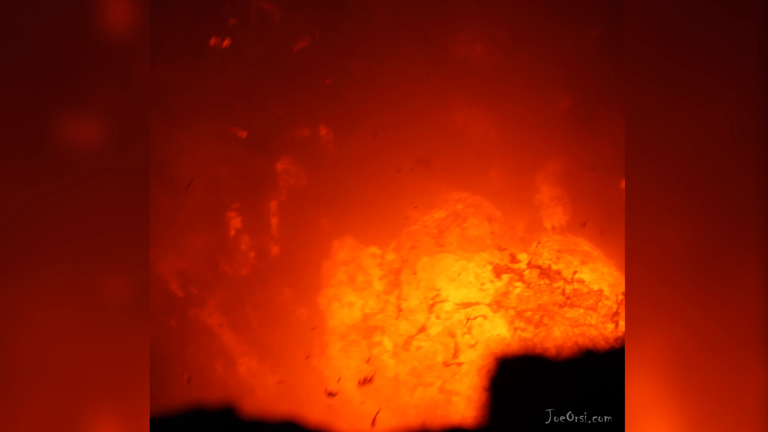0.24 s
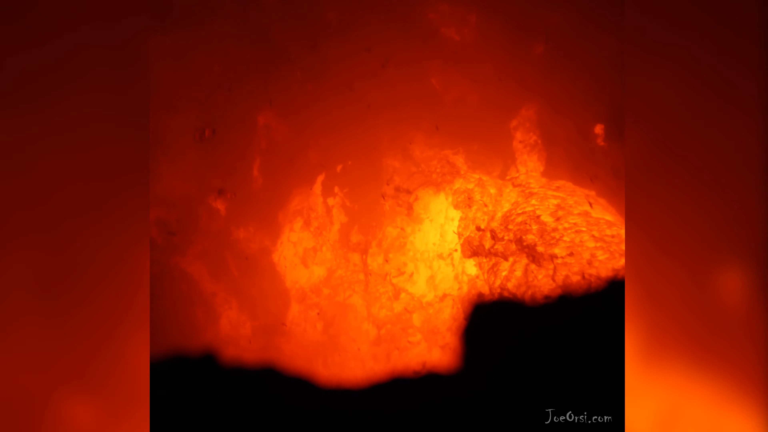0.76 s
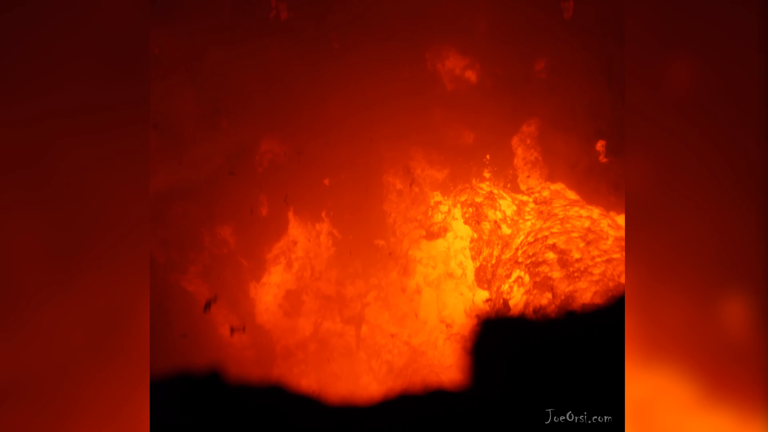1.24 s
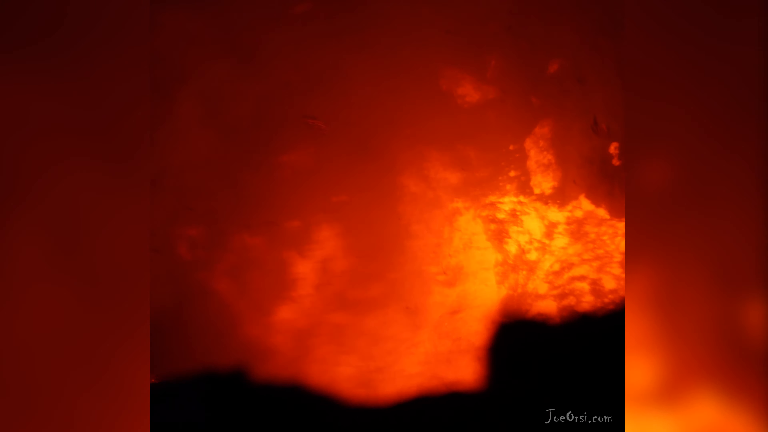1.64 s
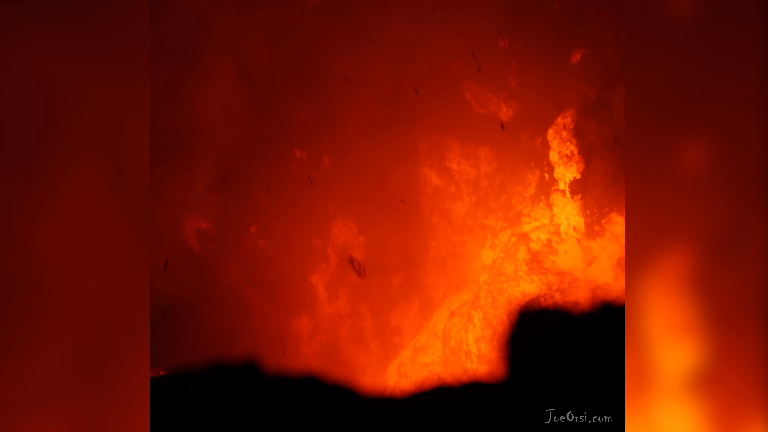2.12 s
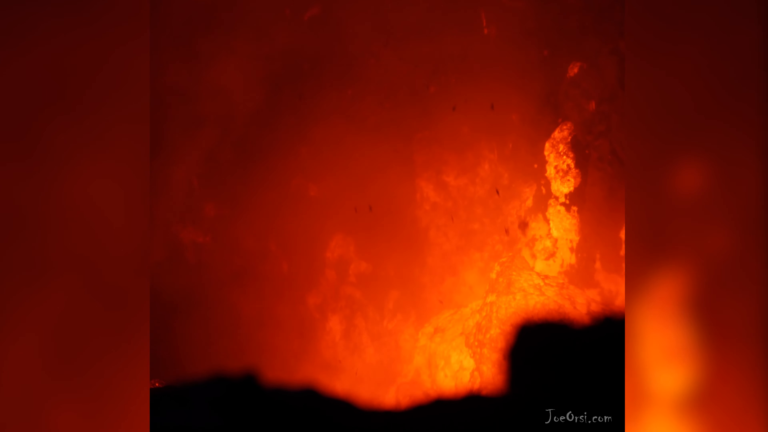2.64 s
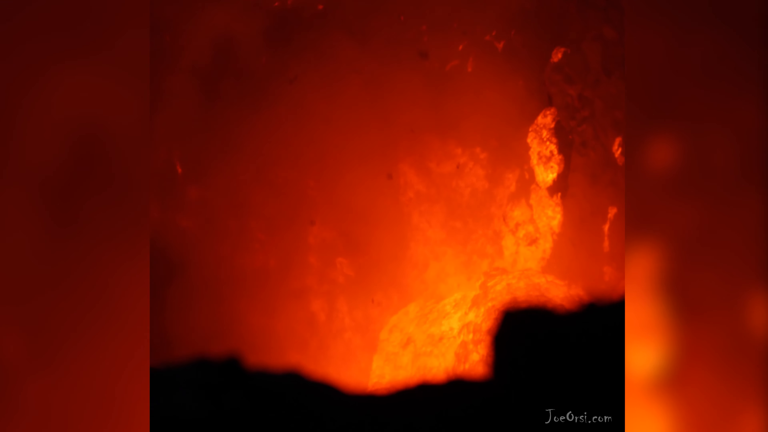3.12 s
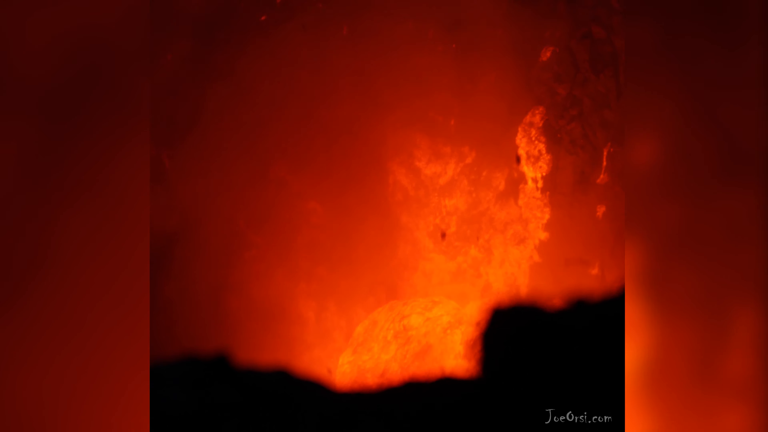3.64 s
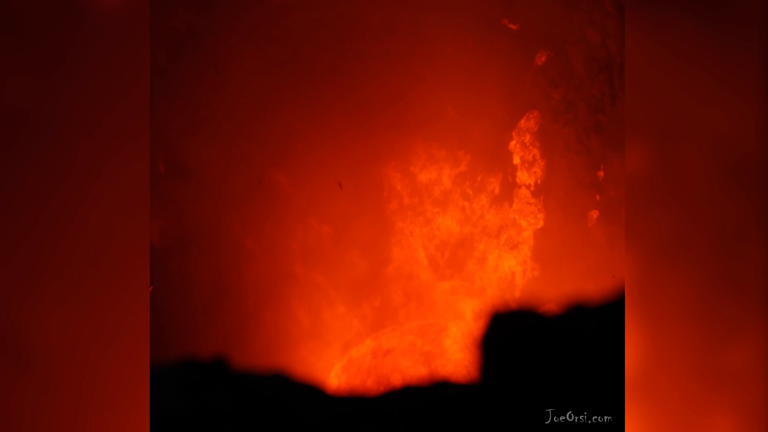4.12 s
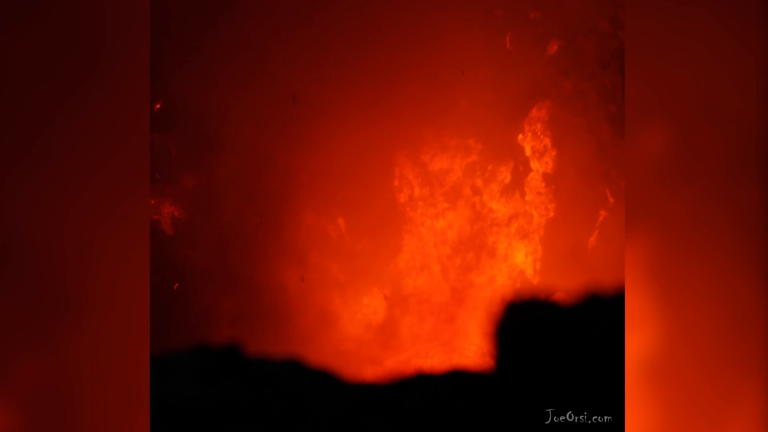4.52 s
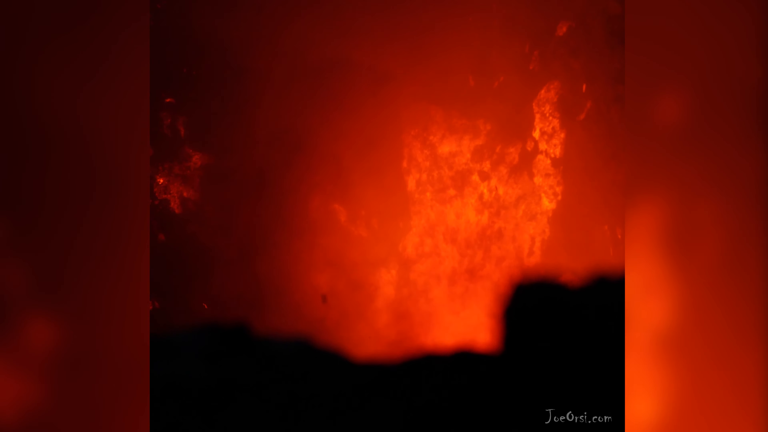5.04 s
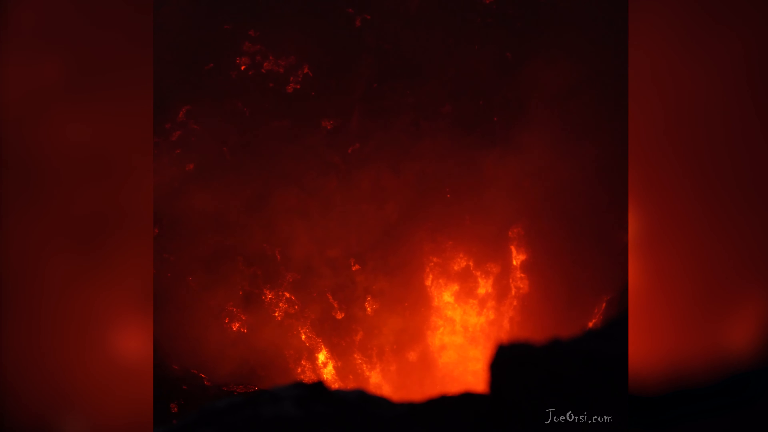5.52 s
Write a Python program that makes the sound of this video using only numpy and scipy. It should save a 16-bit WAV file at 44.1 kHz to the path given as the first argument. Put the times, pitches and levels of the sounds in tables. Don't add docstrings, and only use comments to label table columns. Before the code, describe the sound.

Dark, low volcanic gas roar swells and chokes while big bubbles gulp and boom and thrown lava crunches, clicks and patters on rock.

```python
import sys
import numpy as np
from scipy import signal
from scipy.fft import rfft, irfft, next_fast_len
from scipy.io import wavfile
from scipy.ndimage import uniform_filter1d, minimum_filter1d, map_coordinates

SR = 44100
rng = np.random.default_rng(int(sys.argv[2]) if len(sys.argv) > 2 else 0)


def waveform_to_disk(signal):
    frames = np.transpose(np.atleast_2d(signal))
    scaled = np.clip(frames, -1, 1) * 32767
    samples = np.round(scaled).astype(np.int16)
    wavfile.write(sys.argv[1], SR, samples)


def magnitude_from_level(level_db):
    exponent = np.asarray(level_db, float) / 20
    return 10 ** exponent


N = 254456


def unit(x):
    return x / np.sqrt(np.mean(x ** 2) + 1e-20)


def along(points, hz):
    f, v = np.transpose(points)
    return np.interp(np.log(hz + 1), np.log(f + 1), v)


def wobble(rate):
    knots = rng.standard_normal(int(N * rate / SR) + 4)
    return map_coordinates(knots, [np.arange(N) * rate / SR])


def filtered(x, response):
    m = next_fast_len(x.shape[-1] + 8192)
    spectrum = rfft(x, m) * response(np.fft.rfftfreq(m, 1 / SR))
    return irfft(spectrum, m)[..., :x.shape[-1]]


def add(out, start_s, sound, lean_db):
    part = out[:, max(round(start_s * SR), 0):][:, :sound.shape[-1]]
    part += sound[..., :part.shape[1]] * magnitude_from_level(np.array([[lean_db / 2], [-lean_db / 2]]))


# time_s, flow_db, throatiness_db
JET_FLOW = [(0.0, 6.5, -3.5), (0.681, 9.5, -3.5), (0.708, 1.5, -0.5), (.888, 4.5, -2.5), (.9, 7, -3.5),
            (1.5, 5, -1.6), (1.75, 8.5, -1.6), (2.33, 5.5, 0), (2.72, 4.5, 1), (2.811, -2, 0.5),
            (3.52, 4, -4), (3.7, -4.5, -3.5), (4.2, -2, -4), (4.42, -5, -3), (4.9, -5.5, -7.5),
            (5.19, -3.5, -4.5), (5.23, 0.9, -3), (5.77, 2.2, -3)]
# centre_s, rumble_gain_db, half_length_s
LAKE_HEAVES = [(0.116, 0, 0.09), (0.58, 2, .15), (1.088, 5, 0.13), (1.882, 2, 0.13), (2.271, 3, 0.091),
               (3.104, 2.5, .35), (3.73, 3, 0.16), (4.087, 2.5, 0.14), (4.3, 7, 0.098), (4.559, 2, 0.077),
               (4.956, 4.5, .12), (5.38, 2.5, 0.2)]
# start_s, fizz_gain_db, hold_s, fade_s
GAS_SPURTS = [(0.131, 4.5, 0.027, 0.069), (0.902, 9, 0.2, 0.022), (0.983, 1.5, 0.03, .015),
              (1.146, 8.5, 0.3, 0.24), (1.664, 4, .01, 0.013), (1.733, 5, 0.1, .03), (1.895, 6, 0.2, 0.14),
              (2.153, 3, .18, 0.011), (3.074, 2.5, .01, 0.028), (3.152, 7.5, 0.0026, 0.017),
              (3.473, 1.5, 0.075, .05), (4.17, 5, .05, 0.034), (4.314, 7.5, .03, 0.017),
              (4.362, 9.5, 0.0044, .012), (4.987, 10, 0.014, .02), (5.099, 6, .05, 0.018),
              (5.207, 5.5, .02, 0.012), (5.26, 5.5, .015, 0.013), (5.35, 9.5, 0.051, 0.11),
              (5.685, 4, .015, 0.034)]
# centre_s, hiss_gain_db, half_length_s
JET_CHOKES = [(0.354, 0.5, 0.11), (0.781, 0, .06), (0.913, 2, 0.022), (1.002, 1.5, .025),
              (1.083, 0.5, 0.0099), (1.297, 0, .08), (.67, -1, 0.029), (1.742, -0.5, .03), (1.8, 0, .04),
              (1.876, 0, .02), (2.05, -0.5, 0.089), (2.694, -1.5, 0.054), (3.049, -1, .1), (3.349, -1, .08),
              (3.677, 0, .05), (3.952, -1.5, 0.11), (4.141, 1.5, 0.045), (4.3, 0, .008), (4.468, 0, 0.044),
              (4.65, -1, 0.11), (4.82, -2.5, 0.056), (5.071, -3, .012), (5.185, -2, .014),
              (5.246, -2, 0.0054), (5.313, -2, .008), (5.337, -1, .008), (5.47, -1, 0.048), (5.62, -2, .03)]


def jet_levels(t):
    roar_grows, fizz_grows = 0.64, 1.37
    fizz_db = -5.5
    spurt_rise_s = 0.0043
    time_s, flow, throat = np.transpose(JET_FLOW)
    flow, throat = np.interp(t, time_s, flow), np.interp(t, time_s, throat)

    heave = sum(db * np.exp(-((t - at) / half) ** 2) for at, db, half in LAKE_HEAVES)
    choke = sum(db * np.exp(-((t - at) / half) ** 2) for at, db, half in JET_CHOKES)
    spurt = 0
    for at, db, hold, fade in GAS_SPURTS:
        rising = np.minimum((t - at) / spurt_rise_s, 0)
        fading = (at + hold - t) / fade
        spurt = spurt + db * np.exp(np.minimum(rising, fading))

    flow = flow + choke
    throat = throat + (0.75 - roar_grows) * choke
    roar = roar_grows * flow + throat + 0.49 * heave
    hiss = flow + 0.18 * spurt
    fizz = fizz_db + fizz_grows * flow + spurt
    return np.array([heave, roar, hiss, fizz])


VENT_BANDS_HZ = [90, 450, 1900, 6500]
# pitch_hz, density_db (per Hz)
VENT_COLOUR = [(15, -46.5), (30, -19.5), (50, -18), (70, -4.5), (100, -2), (160, -4.5), (300, -7.5),
               (700, -17.5), (1500, -28), (3000, -42), (5000, -56.5), (7000, -71), (10000, -89),
               (13000, -106)]
# pitch_hz, correlation (0 to 1)
PORT_LIKENESS = [(40, 0.39), (100, 0.75), (180, 0.41), (310, 0.28), (540, 0.32), (930, 0.48), (2200, 0.31),
                 (8000, 0.17)]
# time_s, left_minus_right_db
VENT_LEAN = [(0.0, -.1), (1.0, -0.6), (3.2, -0.3), (3.75, -1), (4.95, 1), (5.5, -0.5), (5.77, 0)]


def vent(patchy_db, surge_db, level_db):
    hz, t, z = signal.stft(rng.standard_normal((2, N)), SR, nperseg=384, noverlap=256)
    bands = len(VENT_BANDS_HZ)
    place = np.interp(np.log(hz + 1), np.log(VENT_BANDS_HZ), np.arange(bands))
    weights = np.clip(1 - abs(place[:, None] - np.arange(bands)), 0, 1)
    weights[:, -1] *= 1 + 0.25 * np.clip(hz / VENT_BANDS_HZ[-1] - 1, 0, 1)

    patches = uniform_filter1d(rng.standard_normal(z.shape[1:]), size=5, axis=0)
    patches = unit(uniform_filter1d(patches, size=18, axis=1))
    shaken = np.clip(place - 0.8, 0, 1) * np.clip(3.3 - place, 0.3, 1)
    shake = wobble(14) + 0.95 * wobble(45)
    puffs = shaken[:, None] * shake[np.minimum(t * SR, N - 1).astype(int)]
    gain_db = weights @ jet_levels(t) + patchy_db * patches + surge_db * puffs
    pair = signal.istft(z * magnitude_from_level(gain_db), SR, nperseg=384, noverlap=256)[1][:, :N]

    def colour(f):
        turn = np.arccos(np.clip(along(PORT_LIKENESS, f), -1, 1)) / 2
        return magnitude_from_level(along(VENT_COLOUR, f)) * [np.cos(turn), np.sin(turn)]

    mid, side = filtered(pair, colour)
    lean = np.interp(np.arange(N) / SR, *np.transpose(VENT_LEAN))
    return magnitude_from_level(level_db + np.outer([0.5, -0.5], lean)) * unit(np.array([mid + side, mid - side]))


# pitch_hz, density_db (per Hz)
WIND_COLOUR = [(12, -41), (25, -16), (45, 3.5), (90, 2.5), (250, -29), (900, -120)]


def wind(level_db, lumpy_db):
    own = np.array([wobble(4.7), wobble(3.2)])
    lumps = magnitude_from_level(lumpy_db * own + 3.4 * wobble(4.0))
    push = filtered(rng.standard_normal((2, N)), lambda f: magnitude_from_level(along(WIND_COLOUR, f)))
    return magnitude_from_level(level_db) * unit(lumps * push)


# centre_s, pitch_hz,
# peak_db, life_s, pitch_rise_share
SLIDING_POCKETS = [(0.202, 100.5, -17, 0.021, -0.28), (0.496, 121.4, -21.5, 0.063, -0.27),
                   (1.055, 103.3, -20, 0.29, 0.25), (1.048, 264, -13.5, .032, 0.4),
                   (1.106, 403, -11.5, 0.023, 0.13), (1.193, 77, -17.5, 0.053, -0.057),
                   (1.393, 111, -11, 0.026, -0.14), (1.818, 105, -16.5, 0.07, 0.055),
                   (1.863, 133.5, -17, 0.068, 0.17), (1.989, 145, -25, 0.058, -0.18),
                   (2.053, 156, -20.5, 0.047, 0.26), (2.81, 89.7, -15.5, 0.093, 0.41),
                   (3.606, 82, -15.5, 0.073, 0.36), (3.898, 92.3, -21, 0.097, 0.03),
                   (4.279, 114, -19, 0.018, -0.081), (4.407, 108.9, -16, .147, -.1),
                   (4.829, 58.4, -29, 0.068, -0.37), (5.165, 110, -16.5, 0.021, 0.38),
                   (5.458, 171, -11.5, 0.013, -0.27), (5.724, 88, -21.5, 0.091, -0.23)]
# centre_s, pitch_hz, peak_db, life_s, left_minus_right_db
GAS_POPS = [(.181, 238, -14.5, 0.022, 6.5), (.604, 626, -30, 0.041, -6), (.885, 990, -23, 0.0073, -3),
            (1.77, 910, -25, 0.026, -3), (2.622, 710, -15, 0.0024, -7), (3.508, 750, -31.5, 0.0066, 12),
            (4.316, 330, -16.5, 0.01, 2), (4.331, 335, -20.5, 0.015, 1), (4.349, 377, -18, 0.0079, 0),
            (4.371, 617, -25, 0.0094, 2), (4.518, 357, -17, 0.015, -1), (5.003, 337, -24.5, 0.039, 4),
            (5.164, 920, -28, 0.011, 0), (5.228, 758, -30, 0.032, 3.6), (5.062, 171.4, -14.5, 0.0087, -4.5),
            (5.298, 473, -19.5, 0.014, 3), (5.31, 280, -16.5, 0.007, -5), (5.359, 300, -18, 0.0039, 0),
            (5.4, 400, -10.5, 0.0023, -5.5), (5.564, 300, -19, 0.015, 0), (5.564, 665, -22, 0.01, -3),
            (5.683, 680, -17, 0.0076, -4)]


def bubbles():
    out = np.zeros((2, N))
    booms = [(*row, -0.5) for row in SLIDING_POCKETS]
    pops = [(s, hz, db, life, 0, lean_db) for s, hz, db, life, lean_db in GAS_POPS]
    for s, hz, db, life, rise, lean_db in booms + pops:
        big = hz < 170
        u = np.arange(-1.5, 2, 1 / (life * SR))
        turns = hz * life * (u + rise * u ** 2 / 2)
        phase = rng.random()
        lag = 0.85 * np.cos(2 * np.pi * phase) * np.array([[0.5], [-0.5]]) * big
        onset = 2.8 if big else 22
        swell = np.exp(-np.where(u < -0.1, onset, 2.2) * (u + 0.1) ** 2)
        song = np.cos(2 * np.pi * (turns + phase) + lag)
        add(out, s - 1.5 * life, magnitude_from_level(db - 1.2) * swell * song, lean_db)
    return out


# start_s, peak_db, dull_above_hz, t60_s, left_minus_right_db
LONE_CLOTS = [(0.685, -18.5, 2480, 0.023, 1), (0.84, -31, 3800, 0.015, 2), (1.042, -18, 2090, 0.091, -1),
              (1.118, -24, 3000, .05, 0), (1.130, -25, 4960, 0.015, 2), (1.964, -30, 3500, .0206, 10),
              (2.55, -28, 2550, 0.041, -23), (3.547, -35.5, 3500, 0.095, -23), (3.794, -39, 3900, .015, -5),
              (4.291, -29, 4200, 0.015, 7), (4.2955, -37, 4400, .012, 1), (4.318, -31.5, 3600, 0.05, -2),
              (4.329, -31.5, 4000, .04, 1), (4.3393, -34, 4600, 0.04, -1.1), (4.348, -29, 3400, .02, 2),
              (4.37, -25.5, 3000, 0.03, 0), (4.37, -35, 5200, 0.007, -4)]
# start_s, peak_db, dull_above_hz, t60_s, left_minus_right_db
SPATTER = [(4.918, -37.5, 2640, 0.099, -14), (4.971, -30.5, 2220, 0.29, -2),
           (4.998, -25.5, 2900, 0.058, -2), (5.011, -32, 2500, 0.054, -8), (5.018, -30, 2500, 0.06, -6),
           (5.049, -32.5, 2780, .04, -21.5), (5.092, -31, 3400, .07, -5), (5.151, -22.5, 1880, 0.04, 5),
           (5.159, -22, 3400, 0.047, 2.5), (5.129, -31, 4400, .02, -4), (5.145, -28, 2800, .012, 0),
           (5.1648, -27.5, 3800, 0.021, 1), (5.262, -20, 2400, 0.037, 4), (5.277, -28, 3000, .03, 0),
           (5.355, -38, 3600, .03, -2), (5.432, -30, 2400, .03, -1), (5.667, -29, 2000, .04, -6),
           (5.216, -24.5, 3370, 0.09, 2), (5.232, -24.5, 2600, 0.098, 1), (5.257, -23.5, 3540, 0.036, 3),
           (5.292, -28.5, 3000, 0.081, 1), (5.323, -28, 3200, 0.044, -1), (5.386, -35, 3000, 0.045, -5),
           (5.398, -25.5, 2400, 0.053, -3), (5.508, -29, 3180, .04, -3)]
# start_s, peak_db, left_minus_right_db
FAR_THUDS = [
    (.601, -20, 2),
    (4.232, -24, -3),
    (4.512, -35, 4),
    (4.613, -32, -3),
    (4.683, -34, 3),
    (4.922, -26, 0),
]
# pitch_hz, density_db (per Hz)
CRUNCH_COLOUR = [(200, 3.5), (1500, 10.5), (4000, -5.5), (12000, -28.5)]
# start_s, peak_db, pitch_hz, t60_s, left_minus_right_db
RINGING_STONES = [(0.838, -29, 2596, 0.0082, 4), (.84, -34.5, 3490, 0.0078, 4.5),
                  (1.094, -41, 3520, 0.043, -1), (1.963, -24.5, 2725, 0.012, -1),
                  (2.551, -32, 1986, 0.013, -1), (3.765, -37, 1464, .05, 1.5),
                  (3.7966, -31, 2335, 0.02, 0.5), (3.797, -39.5, 3570, 0.022, 0),
                  (3.798, -37.5, 1590, .012, 1), (3.803, -40, 1670, 0.043, 0),
                  (4.292, -31, 2260, .008, 3.5), (4.292, -31, 854, 0.0099, 2),
                  (5.097, -38, 1557, 0.026, -1), (5.098, -46.5, 2945, 0.017, 0), (1.121, -35, 3000, .02, 1),
                  (4.316, -55, 4970, .02, 1), (4.318, -38, 1430, .03, -2.5),
                  (4.318, -35.5, 2765, .015, -0.5), (4.322, -39, 3410, 0.025, 3),
                  (4.34, -40.5, 3380, 0.023, 1), (4.339, -34, 1540, .02, 0), (4.342, -50, 4600, .015, 0.5),
                  (4.37, -31, 2490, 0.035, 1.5), (4.371, -36.5, 1787, 0.046, -1),
                  (4.9986, -32.5, 1518, 0.035, 2.5), (4.678, -52, 3100, 0.016, 3),
                  (5.003, -55, 4680, 0.016, 4), (5.014, -32.5, 1507, 0.024, 1),
                  (5.022, -34.5, 1488, 0.031, 0.5), (5.05, -41, 1500, 0.021, -3.5),
                  (5.108, -56, 4600, .012, 0), (5.1511, -35, 1307, 0.015, 2), (5.221, -32, 2014, 0.016, 4),
                  (5.2575, -36.5, 3050, .018, 0.5), (5.325, -34.5, 2246, .018, -1),
                  (5.512, -39.5, 1510, 0.013, -1)]
# start_s, peak_db, pitch_hz, rise_s,
# left_minus_right_db
GRIT_TICKS = [(3.155, -54, 5870, 0.00013, 15), (4.862, -53, 4500, .0002, -12), (5.148, -54, 4970, .0004, 9),
              (0.84, -32, 3000, .0002, 3), (1.13, -36, 3600, .00015, 2), (1.9649, -28, 2600, .0002, 2),
              (2.5515, -33, 2000, .0003, -6), (3.7965, -42, 2600, .00015, -2),
              (4.2933, -35, 2600, .0002, 4), (4.2962, -42, 3000, .0002, 1),
              (4.3702, -33.5, 2600, .00015, 0), (5.035, -49, 3300, .0003, 0), (5.122, -54, 4300, .0003, -3),
              (5.1475, -37, 2200, .0002, 3), (5.153, -31, 1400, .0006, 1), (5.3508, -40, 3000, .0002, -2),
              (3.27, -68, 8000, .00008, 0), (3.43, -70, 8000, .00008, 0), (3.512, -68, 8000, .00008, 4),
              (4.516, -75, 12000, .00002, 2), (4.5135, -21, 470, .001, 2), (4.684, -21.5, 330, .0015, 2),
              (.601, -24, 650, .001, -1), (4.232, -26, 600, .001, -2), (5.3498, -50, 8000, 0.00003, -3)]


def cinders():
    out, t = np.zeros((2, N)), np.arange(SR // 6) / SR

    def far(x, hz):
        return signal.sosfilt(signal.butter(6, min(1.7 * hz, 20000), fs=SR, output="sos"), x)

    clots = [(s, db, 0.38 * hz, t60, hz, lean_db) for s, db, hz, t60, lean_db in LONE_CLOTS]
    clots += [(s, db, 0.09 * hz, t60, hz, lean_db) for s, db, hz, t60, lean_db in SPATTER]
    clots += [(s, db, 0.39 * 990, 0.016, 990, lean_db) for s, db, lean_db in FAR_THUDS]
    for s, db, thin_hz, t60, dull_hz, lean_db in clots:
        spreading = 1 - np.exp(-t / (0.015 * t60))
        fade = magnitude_from_level(-60 * t / t60) * spreading * np.cos(np.pi / 2 * t / t[-1])
        grains = magnitude_from_level(1.4 * np.repeat(rng.standard_normal(len(t) // 40 + 1), 40)[:len(t)])
        noise = grains * rng.standard_normal((2, len(t)))
        crunch = filtered(noise, lambda f: magnitude_from_level(along(CRUNCH_COLOUR, f)))
        spread = crunch[0] + 0.26 * np.array([[1], [-1]]) * crunch[1]
        air = signal.butter(5, dull_hz, fs=SR, output="sos")
        size = signal.butter(2, thin_hz, "high", fs=SR, output="sos")
        splat = signal.sosfilt(np.vstack([air, size]), fade * spread)
        balance = np.linalg.norm(fade) / np.linalg.norm(splat.mean(axis=0))
        add(out, s, magnitude_from_level(db - 7.0) * splat * balance, lean_db)

    for s, db, hz, t60, lean_db in RINGING_STONES:
        wander = 0.07 * uniform_filter1d(np.cumsum(rng.standard_normal(len(t))), size=30)
        strike = 1 - np.exp(-(t / 0.00045) ** 2)
        ring = magnitude_from_level(db - 60 * t / t60) * strike * np.sin(2 * np.pi * hz * t + wander)
        add(out, s, far(ring, hz), lean_db)

    for s, db, hz, rise, lean_db in GRIT_TICKS:
        pulse = t / rise * np.exp(1 - t / rise)
        add(out, s, far(magnitude_from_level(db) * np.sin(2 * np.pi * hz * t) * pulse, hz), lean_db)
    return out


def scene():
    gas = vent(patchy_db=0.5, surge_db=0.58, level_db=-22.0)
    return gas + wind(level_db=-50.5, lumpy_db=11.0) + bubbles() + cinders()


def low_pass(x):
    return signal.sosfilt(signal.butter(12, 15800, fs=SR, output="sos"), x)


def record(dry):
    heard = filtered(dry, lambda f: f ** 2 / np.sqrt(f ** 4 + 34 ** 4))
    hiss = filtered(rng.standard_normal((2, N)), lambda f: 1 / (1 + (f / 9700) ** 40))
    heard = heard + magnitude_from_level(-94.0) * unit(hiss)
    need = np.minimum(1, 0.43 / (abs(heard).max(axis=0) + 1e-9))
    gain = uniform_filter1d(minimum_filter1d(need, size=801), size=400)
    ending = np.sin(np.pi / 2 * np.clip((N - np.arange(N)) / 60, 0, 1)) ** 2
    return low_pass(heard * gain * ending)


dry = scene()
out = record(dry)
waveform_to_disk(out)
```